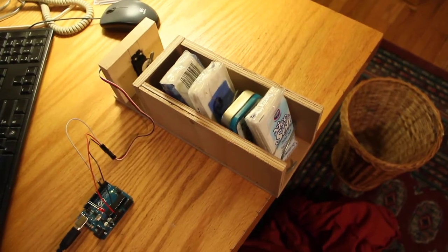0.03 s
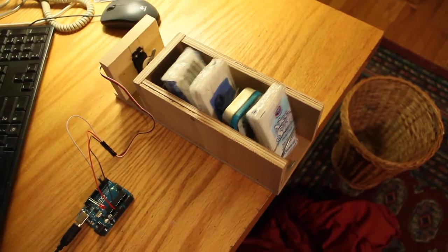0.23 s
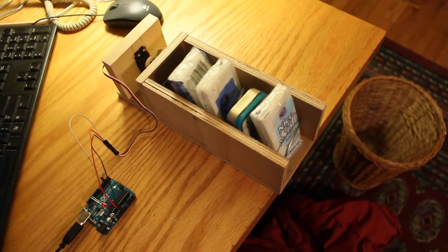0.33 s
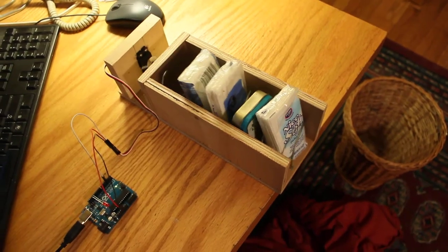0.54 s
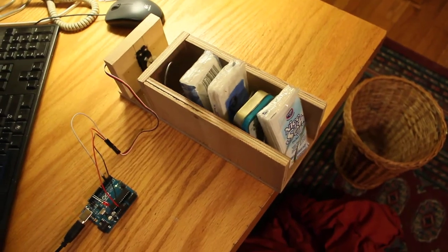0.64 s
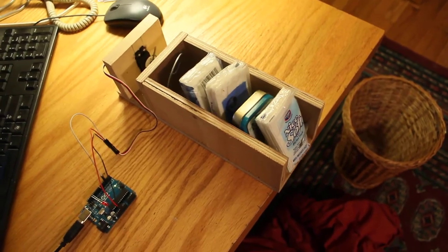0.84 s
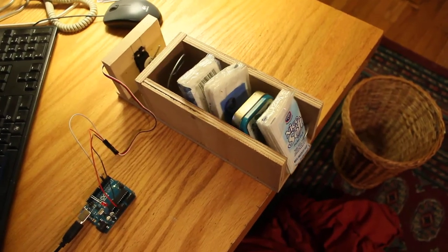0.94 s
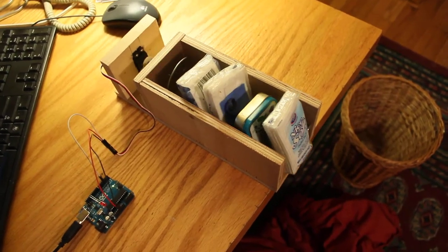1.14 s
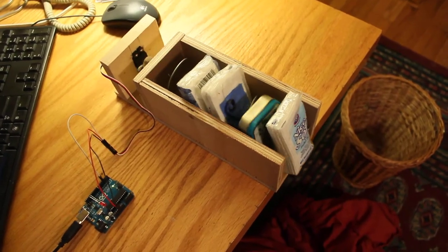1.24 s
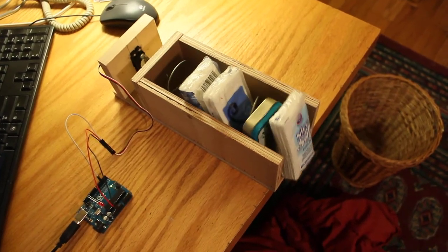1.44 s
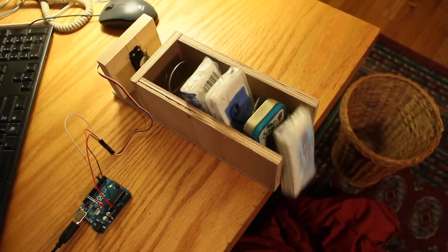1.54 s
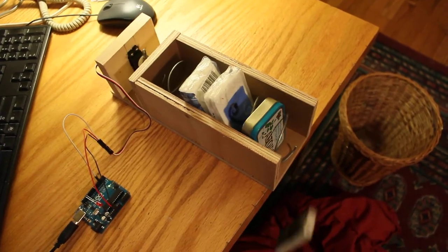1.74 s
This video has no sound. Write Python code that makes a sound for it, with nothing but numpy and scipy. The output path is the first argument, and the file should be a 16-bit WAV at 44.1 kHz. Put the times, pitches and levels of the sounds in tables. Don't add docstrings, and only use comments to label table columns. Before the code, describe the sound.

A small servo motor: faint mains hum and air until 0.15 s, then its gears spin up into a bright, raspy plastic whir. From 0.3 to 0.5 s it strains and judders, packets scraping loudly with a tick near 0.37 s. Steady grinding follows with wavering whines, slightly slowing. Ticks near 1.4 s; at 1.5 s it stops, coasts briefly, packets settle, quiet room.

```python
import sys
import numpy as np
from scipy import signal
from scipy.fft import rfft, irfft
from scipy.io import wavfile
from scipy.ndimage import uniform_filter1d

SR = 44100
rng = np.random.default_rng(int(sys.argv[2]) if len(sys.argv) > 2 else 0)


def wav_out(sig):
    wavfile.write(sys.argv[1], SR, np.round(np.clip(np.atleast_2d(sig).T, -1, 1) * 32767).astype(np.int16))


def voltage_ratio(decibels):
    exponent = np.asarray(decibels, float) / 20
    return 10 ** exponent


N = 79380


def level(x, db):
    return x * voltage_ratio(db) / np.sqrt(np.mean(x ** 2))


def curve(table):
    return np.interp(np.arange(N) / SR, *np.array(table).T)


def colour(x, shape):
    hz, db = np.array(shape).T
    grid_hz = np.arange(513) * SR / 1024
    log_gain = np.interp(np.log(grid_hz + 1), np.log(hz), db) * np.log(10) / 20
    cepstrum = irfft(log_gain)
    cepstrum[1:512] *= 2
    cepstrum[513:] = 0
    impulse = irfft(np.exp(rfft(cepstrum)))
    return signal.fftconvolve(x, impulse)[:len(x)]


def ring(x, modes):
    out = 0
    for k, (hz, width_hz, db) in enumerate(modes):
        b, a = signal.iirpeak(hz, hz / max(width_hz, 10), fs=SR)
        out = out + (-1) ** k * voltage_ratio(db) * signal.lfilter(b, a, x)
    return out


def walk(rate_hz):
    hold = int(SR / rate_hz)
    steps = np.repeat(rng.standard_normal(N // 20), hold)[:N]
    return 1.72 * uniform_filter1d(uniform_filter1d(steps, hold), hold)


def grit(spread_db):
    return rng.standard_normal(N) * voltage_ratio(spread_db * rng.exponential(size=N))


def room():
    # f/Hz, level/dB
    hum_tones = [(119.8, -60), (80, -82.5), (282.7, -85)]
    # f/Hz, level/dB
    air_tint = [(25, -51), (70, -35), (100, -22.5), (290, -11.5), (540, -21.5), (2000, -32.5),
                (6000, -36.5), (16000, -46.5)]
    t = np.arange(N) / SR
    hum = sum(voltage_ratio(db + 2 + 0.43 * walk(16)) * np.sin(2 * np.pi * hz * t) for hz, db in hum_tones)
    hz, db = np.array(air_tint).T
    bin_hz = np.arange(N // 2 + 1) * SR / N
    gain = voltage_ratio(np.interp(np.log(bin_hz + 1), np.log(hz), db))
    air = irfft(rfft(rng.standard_normal(N)) * gain, N)
    return hum + level(air, -72)


def whines(turns):
    # start t/s, end t/s, multiple of the shaft rate, phase wander/cycles, peak level/dB
    whine_notes = [(.175, .22, 6.8, .05, -66), (.32, .48, 5.25, .1, -55), (.4, .62, 1, .14, -66),
                   (.55, 1.25, 10, .1, -66), (.7, .97, 3.6, .13, -60), (.97, 1.5, 3, .1, -65),
                   (1.02, 1.4, 5, .12, -67), (1.03, 1.32, 7.15, .16, -58), (1.05, 1.35, 3.45, .18, -65),
                   (1.26, 1.49, 10, .05, -60), (1.26, 1.38, 7, .07, -59), (1.365, 1.47, 7, .05, -55),
                   (1.34, 1.6, 1.1, .14, -68), (1.49, 1.61, 6.2, .18, -61), (1.49, 1.63, 3.55, .1, -61),
                   (1.58, 1.75, 3.45, .08, -70)]
    t, out = np.arange(N) / SR, 0
    for on, off, multiple, wander, db in whine_notes:
        rise = (t - on) / .015
        fall = (off - t) / (.3 * (off - on))
        gate = np.clip(np.minimum(rise, fall), 0, 1)
        cycles = multiple * turns + wander * walk(70)
        out = out + gate * voltage_ratio(db + 2 * walk(70)) * np.sin(2 * np.pi * cycles)
    return out


def packets():
    # t/s, level/dB
    scraping = [(.16, -76), (.212, -67), (.226, -50.5), (.3, -47), (.325, -43.5), (.345, -39.5),
                (.37, -35.5), (.41, -41), (.46, -42.5), (.6, -51.5), (1.0, -51), (1.47, -48.5), (1.5, -54),
                (1.59, -60), (1.66, -85)]
    # t/s, level/dB, length/ms
    slips = [
        (0.226, -51.5, 12),
        (.367, -37.5, 4.),
        (0.731, -52, 3.),
        (1.371, -42.5, 1.8),
        (1.398, -48.5, 1.9),
        (1.491, -44, 4.1),
        (1.484, -47, 13),
        (1.497, -51, 2),
        (1.52, -55, 3.),
    ]
    # f/Hz, width/Hz, level/dB
    box = [(398, 120, -2.5), (668, 66, 8), (1080, 70, -55), (1389, 60, 12), (1717, 43, 0),
           (2140, 210, -9.5), (2620, 200, -19), (3540, 88, 6.5)]
    # f/Hz, level/dB
    wood_tint = [(150, 0), (300, -6.5), (600, 1), (2000, 7), (4000, -2), (8000, -27), (16000, -29)]
    # f/Hz, level/dB
    slip_tint = [(500, -20.5), (1200, 0), (4500, -1.5), (7000, -31), (16000, -46)]
    grains = grit(1.82) * voltage_ratio(1.03 * walk(59.85))
    box_scrape = level(ring(grains, box), -4.5)
    wood_scrape = level(colour(grains, wood_tint), -4.5)
    scrape = (box_scrape + wood_scrape) * voltage_ratio(curve(scraping))
    hits, lag_ms = np.zeros(N), np.arange(900) / SR * 1000
    for s, db, length_ms in slips:
        burst = rng.standard_normal(900) * np.exp(-lag_ms / length_ms)
        hits[int(s * SR):][:900] += voltage_ratio(db + 12.5) * burst
    return scrape + .3 * ring(hits, box) + colour(hits, slip_tint)


def strain():
    # f/Hz, width/Hz, level/dB
    strained_case = [(2820, 99, -5), (3442, 127, -4), (3660, 134, -5), (6450, 85, 2.5), (6960, 140, -6),
                     (7140, 200, -6.5)]
    on_s, off_s = .31, .5
    t = np.arange(N) / SR
    gate = np.clip(np.minimum((t - on_s) / 0.0085, (off_s - t) / .08), 0, 1)
    judder = grit(0.49) * voltage_ratio(1.0 * walk(111))
    return gate * level(ring(judder, strained_case), -41)


def tooth_ticks(turns, teeth_per_turn):
    teeth = teeth_per_turn * turns + 0.054 * walk(400)
    pattern = rng.standard_normal(teeth_per_turn)[teeth.astype(int) % teeth_per_turn]
    pulses = np.exp(25.0 * (np.cos(2 * np.pi * teeth) - 1))
    return pulses * voltage_ratio(2.5 * pattern + 5.6 * walk(300) + 0.83 * walk(39.2))


def servo(turns, teeth_per_turn):
    # t/s, level/dB
    effort = [(0.156, -59.5), (0.218, -44), (0.372, -37.5), (0.51, -40.5), (0.518, -31.5), (0.56, -52.5),
              (0.582, -32), (0.612, -47.5), (0.63, -38.5), (0.942, -37), (0.952, -41), (0.968, -36),
              (1.102, -35.5), (1.106, -39), (1.264, -37), (1.286, -34), (1.48, -36), (1.5, -57)]
    # t/s, level/dB
    slack = [(.156, -63.5), (.205, -61.5), (.212, -55.5), (.235, -53), (.3, -51.5), (.35, -48), (.5, -52.5),
             (.66, -53.5), (1.0, -58), (1.47, -60), (1.5, -59)]
    case_hz = [3520, 3900, 4550, 5000, 5600, 5940, 6280, 6680, 7200, 7900, 9400, 11000]
    # width/Hz, level/dB
    case_rows = [(151, -20.5), (204, -14.5), (216, -10.5), (150, -12), (205, -10), (162, 2.5), (151, 1),
                 (193, -5.5), (600, -12.5), (280, -7), (570, -24), (1400, -36.5)]
    # f/Hz, level/dB
    rattle_tint = [(1000, -19), (2500, -21), (4500, -9), (7000, 2), (9000, -1.5), (11000, -7.5),
                   (12500, -18), (16000, -21.5)]
    COAST_HZ = 6100
    # f/Hz, level/dB
    coast_tint = [(530, -23), (3800, -19), (4900, -7), (COAST_HZ, 0), (6700, -9.5), (9100, -18),
                  (16000, -39)]
    # f/Hz, width/Hz
    wall_dips = [(6480, 120), (8650, 500), (10100, 400), (11950, 400), (13000, 300)]
    power_off_s, coast_end_s = 1.495, 1.552

    t = np.arange(N) / SR
    modes = [(hz, *row) for hz, row in zip(case_hz, case_rows)]
    ticks = tooth_ticks(turns, teeth_per_turn)
    beat_db = 2 * np.cos(2 * np.pi * turns) + 2.5 * np.cos(4 * np.pi * turns)
    beat = voltage_ratio(beat_db + .8 * walk(45) + .6 * walk(120))

    rough = sum(ring(level(grit(0.35) * beat, -4.5), half) for half in (modes[::2], modes[1::2]))
    ticked = level(ring(np.diff(ticks, prepend=0), modes), -3.5)
    case = level(rough, -2.4) + level(np.tanh(ticked), -6.0)
    rattle = level(colour(grit(0.76) * beat, rattle_tint), 8.9)
    driven = case * voltage_ratio(curve(effort)) + rattle * voltage_ratio(curve(slack))

    after = np.clip(t - power_off_s, 0, 1)
    after_end = np.clip(t - coast_end_s, 0, 1)
    coast_gain = np.clip(after / .012, 0, 1) * voltage_ratio(-43 * after - 400 * after_end)
    coast = coast_gain * level(colour(grit(0.64) * beat, coast_tint), -42)
    out = driven * voltage_ratio(-900 * after) + coast
    for hz, width_hz in wall_dips:
        out = out - 0.66 * ring(out, [(hz, width_hz, 0)])
    return out


def room_tail(near):
    t60_s = .27
    lag = np.arange(SR // 2) / SR
    tail = rng.standard_normal(len(lag)) * voltage_ratio(-60 * lag / t60_s) * (lag > .004)
    tail = signal.lfilter(*signal.butter(1, 7000, fs=SR), tail)
    return voltage_ratio(-8) * signal.fftconvolve(near, tail / np.linalg.norm(tail))[:N]


def scene():
    # t/s, tooth rate f/Hz
    tooth_rate = [
        (.2, 2020),
        (.3, 2075),
        (.45, 2080),
        (.5, 1995),
        (.8, 1992),
        (1.1, 1975),
        (1.3, 1950),
        (1.46, 1943),
        (1.6, 1955),
    ]
    teeth_per_turn = 10
    t = np.arange(N) / SR
    turns = np.cumsum(curve(tooth_rate)) / SR / teeth_per_turn
    on = np.clip((t - .1548) / .001, 0, 1) * np.clip((1.72 - t) / 0.027, 0, 1)
    near = on * (servo(turns, teeth_per_turn) + strain() + packets()) + whines(turns)
    near = signal.sosfilt(signal.butter(4, 145, "high", fs=SR, output="sos"), near)
    return (near + room_tail(near) + room())[None]


def low_pass(x):
    return signal.sosfilt(signal.butter(12, 15740, fs=SR, output="sos"), x)


def record(dry):
    return low_pass(dry)


dry = scene()
out = record(dry)
wav_out(out)
```